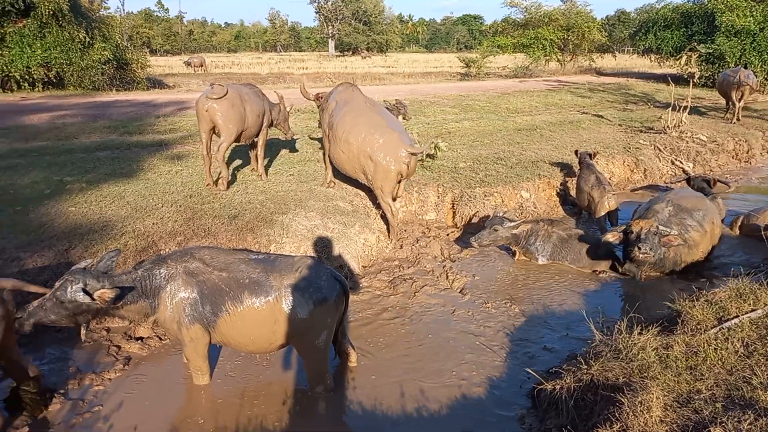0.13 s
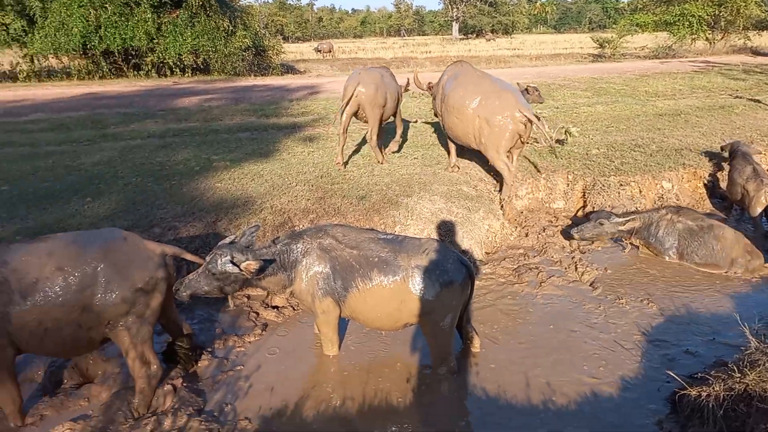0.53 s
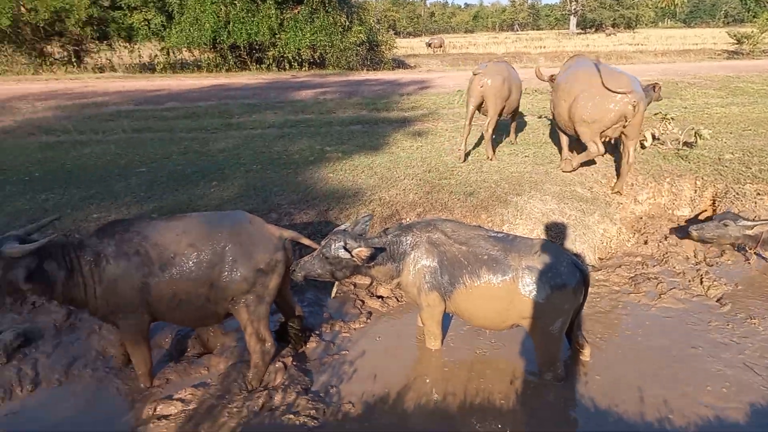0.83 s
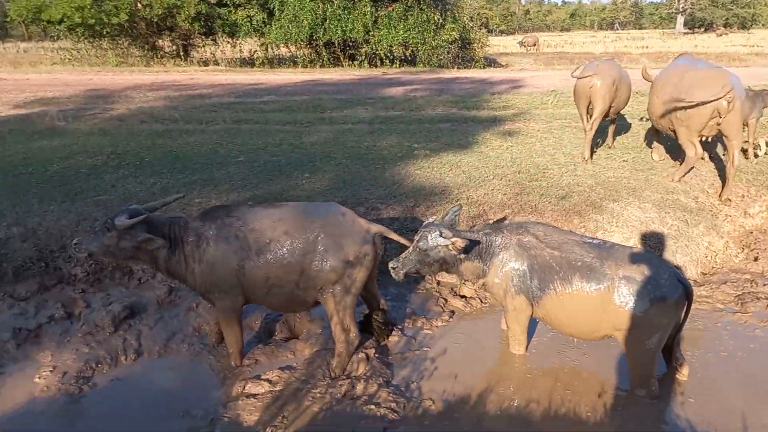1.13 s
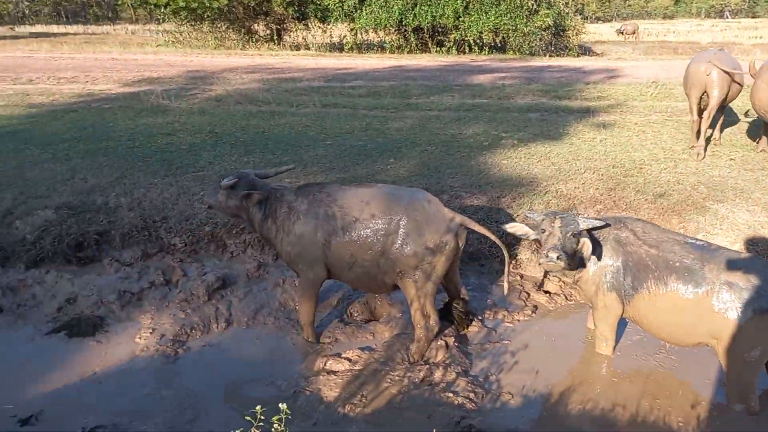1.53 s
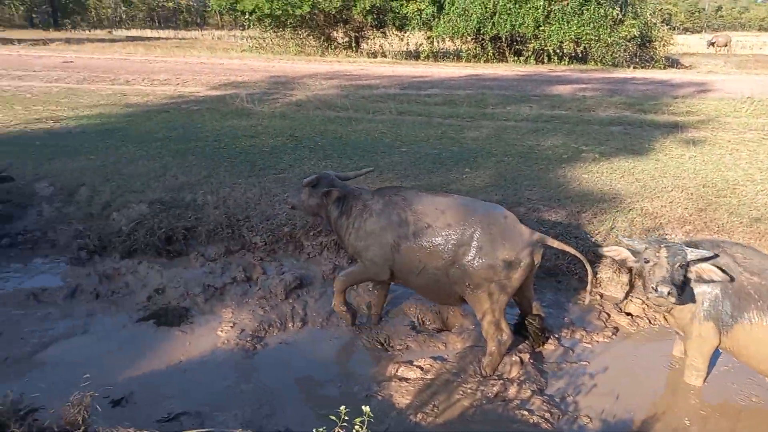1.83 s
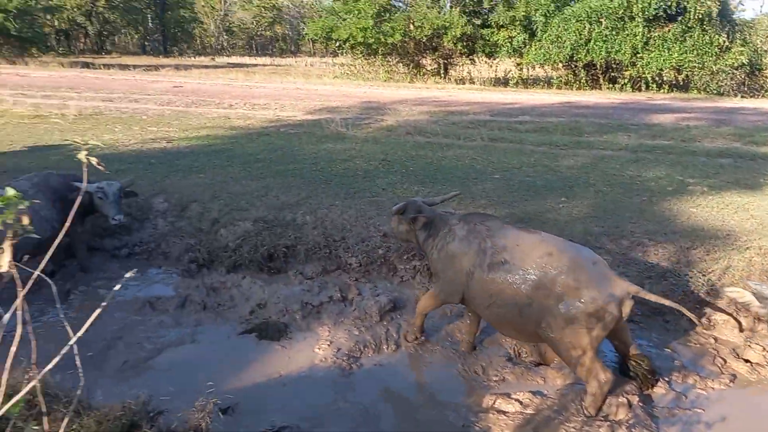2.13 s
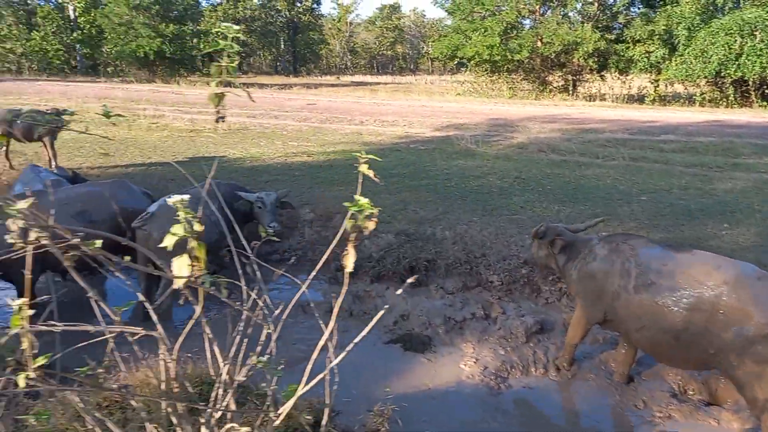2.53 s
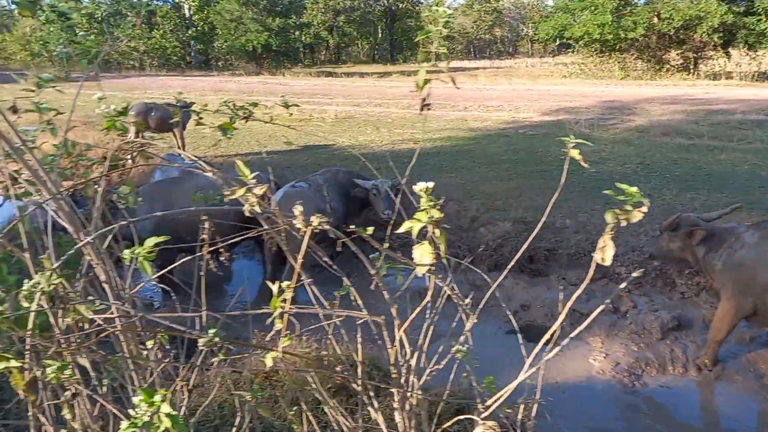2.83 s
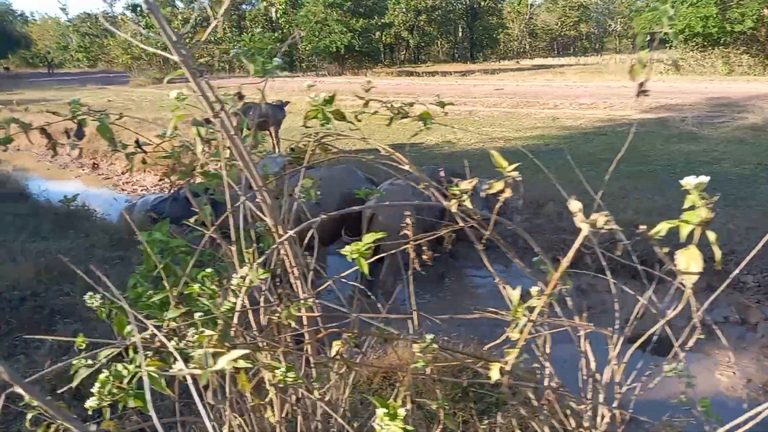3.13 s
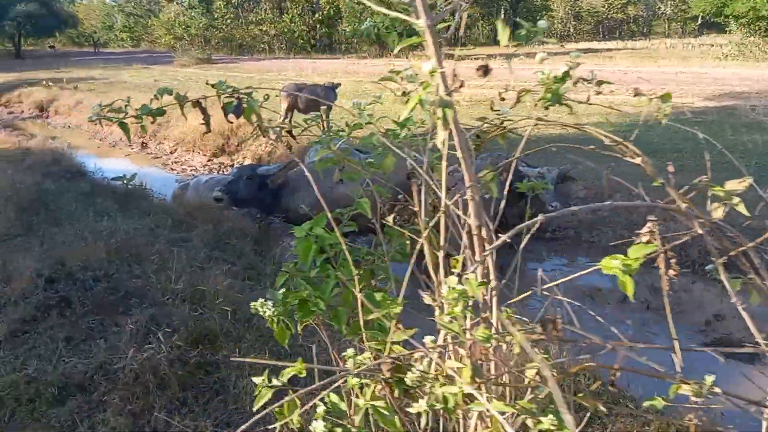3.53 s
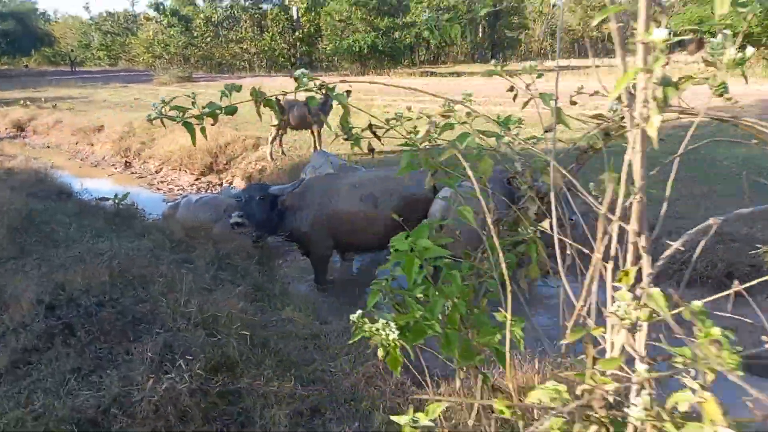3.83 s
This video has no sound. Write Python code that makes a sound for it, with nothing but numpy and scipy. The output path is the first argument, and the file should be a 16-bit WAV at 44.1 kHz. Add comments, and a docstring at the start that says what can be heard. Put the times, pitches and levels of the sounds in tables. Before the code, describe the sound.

Buffaloes wade in a muddy ditch outdoors: gurgling slosh and popping bubbles first, then a run of heavy wet splashes, then quieter stirring with wind buffeting the microphone and stalks crackling close by.

```python
"""Buffaloes wade and wallow in a muddy ditch, with dry stalks crackling near the microphone throughout.
From the start, random grains of plops slosh and gurgle; rising sines pop as bubbles; one splash falls early.
After 1.5 s a run of splashes follows, each a cluster of low plops and clicks. From 2.6 s gusts of lumpy low
noise rumble in the right port, with crunches on drier ground, and after 3.2 s large bubbles pop again.
The right port is muffled in the treble; the left is thin in the bass and hears a little later."""
import sys
import numpy as np
from scipy import signal
from scipy.fft import rfft, irfft, next_fast_len
from scipy.io import wavfile
from scipy.ndimage import uniform_filter1d

SR = 44100
rng = np.random.default_rng(int(sys.argv[2]) if len(sys.argv) > 2 else 0)


def waveform_to_disk(signal):
    """Save audio, clipped to [-1, 1], as 16-bit WAV at the path in sys.argv[1]."""
    frames = np.transpose(np.atleast_2d(signal))
    scaled = np.clip(frames, -1, 1) * 32767
    samples = np.round(scaled).astype(np.int16)
    wavfile.write(sys.argv[1], SR, samples)


N = 176400  # samples, 4 s

# Levels of the ditch and ground sounds are those ahead of the two ports.
# Far low hum: (frequency [Hz], density [dB per Hz, relative])
HUM_COLOUR = [(25, -35), (60, -4), (150, 0.5), (200, -18), (320, -14.5)]
# Low rumble: (frequency [Hz], density [dB per Hz, relative])
RUMBLE_COLOUR = [(28, -47), (52, 0.5), (107, 0), (190, -12), (360, -25.5), (600, -43.5)]
# Gusts on the right port: (time [s], level [dB])
RIGHT_GUSTS = [(2.45, -64), (2.6, -58), (2.69, -24.5), (2.76, -33.5), (2.82, -25.5), (3.04, -26.5),
               (3.1, -32), (3.25, -48), (3.42, -37), (3.64, -29), (3.77, -33), (3.88, -24.5), (4, -26.5)]
# Faint low rumble on the left port: (time [s], level [dB])
FAINT_LEFT_RUMBLE = [(0, -80), (1.55, -81), (1.67, -57), (2.25, -70.5)]
# Single buffets on the right port: (time [s], peak [dB])
WIND_BUFFETS = [(2.861, -21.5), (2.974, -33), (3.077, -29), (3.891, -31.5), (3.925, -18)]

# Crunches in grass and crusted mud: (time [s], level [dB], 60 dB decay [s])
GROUND_CRUNCHES = [(2.821, -53, 0.91), (3.04, -47, 0.26), (3.52, -51.5, 0.24), (3.576, -63, 0.034),
                   (3.704, -39.5, 0.14)]
# Crunch clicks: (frequency [Hz], density [dB per Hz, relative])
CRUST_COLOUR = [(1100, -4), (1600, 4.5), (2800, -3), (3600, -6)]
# Snapping stalks near the microphone: (time [s], level [dB], 60 dB decay [s])
STALK_SNAPS = [(0.12, -46, 0.11), (0.264, -36.5, 0.056), (0.495, -38, 0.032), (.893, -53.5, 0.22),
               (1.624, -48.5, 0.21), (2.124, -42.5, 0.026), (2.134, -36.5, 0.05), (2.232, -51, 0.072),
               (2.331, -51.5, 0.064), (2.71, -54.5, 0.2), (2.975, -49, 0.37), (3.002, -45, 0.035),
               (3.007, -51, 0.029), (3.014, -44, 0.3), (3.029, -35, 0.015), (3.508, -52.5, 0.23),
               (3.611, -46.5, 0.4), (3.707, -44, 0.21)]
# Stalk clicks: (frequency [Hz], density [dB per Hz, relative])
STALK_COLOUR = [(2000, -3), (3000, -2.5), (5100, -5.5), (6800, 0.5), (16000, -1)]

# Deep slosh of wading bodies: (time [s], level [dB])
WADING_LEVEL = [(0, -45), (.35, -43), (.55, -60), (.75, -59), (1.0, -53), (1.18, -56.5), (1.4, -70.5),
                (1.78, -75.5), (2.0, -53.5), (2.35, -75.5), (2.55, -58), (3.18, -66.5), (3.24, -44.5),
                (3.43, -46.5), (3.52, -66.5), (3.63, -53), (3.75, -68), (4, -82)]
# Finer water: (time [s], gurgle level [dB], drip and spray level [dB])
WATER_LEVELS = [(0, -51.5, -55), (.25, -49.5, -56), (.48, -48, -51.5), (.75, -56, -62),
                (1.12, -50.5, -52.5), (1.5, -56.5, -59.5), (1.78, -56, -60.5), (2.1, -51, -56.5),
                (2.3, -69, -64), (2.47, -78, -68.5), (2.55, -64.5, -65.5), (2.85, -59.5, -55.5),
                (3.15, -60.5, -59), (3.35, -56.5, -55), (3.5, -58, -62.5), (3.95, -63.5, -57.5)]
# Slosh, gurgle and spray, each: (frequency [Hz], density [dB per Hz, relative])
SLOSH_COLOUR = [(200, -5.5), (330, -6.5), (550, -4), (750, -10.5), (1200, -20.5)]
GURGLE_COLOUR = [(550, -9.5), (900, 1), (1400, -4), (2500, -8.5), (4000, -21)]
SPRAY_COLOUR = [(2500, 3), (3500, -8.5), (4800, -3.5), (16000, -5)]
# Large bubbles and drips: (time [s], level [dB], starting pitch [Hz], decay [cycles])
BUBBLE_POPS = [(0.265, -29.5, 213, 8.5), (.415, -32, 612, 7.8), (0.441, -32, 900, 8.8),
               (0.469, -29.5, 933, 7.6), (0.644, -35, 3330, 6.3), (.805, -41.5, 913, 12),
               (.826, -36, 910, 8.6), (.944, -35, 740, 6.2), (1.011, -39, 930, 9.9),
               (1.602, -23.5, 602, 5.5), (1.613, -21, 620, 4.7), (1.863, -32, 1750, 7.2),
               (1.881, -20, 199, 1.64), (1.981, -32.5, 612, 9.9), (1.992, -37, 1340, 12),
               (2.035, -35, 830, 11), (2.166, -29.5, 937, 3.8), (3.221, -31, 295.5, 8.8),
               (3.289, -18, 620, 2.5), (3.31, -22, 401, 4)]
# Splashes: (time [s], deep level [dB], bright level [dB], 60 dB decay [s])
SPLASH_HITS = [(0.268, -41, -51.5, 0.42), (1.587, -37, -44.5, 0.18), (1.601, -50, -30.5, 0.054),
               (1.612, -35, -36.5, 0.22), (1.825, -38.5, -40, 0.11), (1.852, -58, -41, 0.046),
               (1.861, -47, -41, 0.1), (1.88, -48, -43, 0.075), (1.92, -49.5, -43.5, 0.096),
               (1.935, -52, -44.5, 0.05), (2.001, -64, -38, 0.037), (2.057, -51, -41.5, 0.049),
               (2.489, -58, -61.5, 0.63), (3.293, -48, -44, 0.22), (3.409, -55, -81, 0.071)]
# Thud grains and smack clicks of a splash, each: (frequency [Hz], density [dB per Hz, relative])
THUD_COLOUR = [(100, -5), (230, 4), (315, -16.5), (650, -0.5), (1100, -32)]
SMACK_COLOUR = [(700, -19), (1120, -1), (2200, -6.5), (3200, -12.5), (3900, -42), (5100, -17.5),
                (6500, -30)]

# Left port over right port: (frequency [Hz], ratio [dB])
PORT_RATIO = [(100, -61), (270, -12.5), (450, -4), (800, -1.5), (1300, -0.5), (2000, 2.5), (3100, 2.5),
              (4500, 28), (6000, 29), (7500, 44), (9500, 7.5), (12000, 18), (15500, -7.5)]
# Share that both ports hear alike: (frequency [Hz], share [0 to 1])
PORT_SHARE = [(300, 1), (700, 1), (1500, 0.69), (4000, 0.19)]
# Treble colour of the microphone: (frequency [Hz], gain [dB])
MIC_TREBLE = [(7300, 1), (8300, -7.5), (9500, -19.5), (12500, -10), (15800, -13)]

HUM_DB, LUMP_DB = -50.5, 4.5  # right-port hum level; depth of the lumps in the rumble
BUFFET_HZ, BUFFET_CYCLES = 176, 0.9  # starting pitch; decay in cycles
SPLASH_RISE_S, SNAP_RISE_S = 0.0017, 0.0014  # time constants of the rise
SOFT_START = 0.98  # cycles, time constant of a plop's onset
GLIDE = 0.082  # fraction by which a plop's pitch rises over its decay cycles
LAG_S = 0.00022  # left port behind right
EDGE_HZ = 15850  # upper band limit


def amp(db):
    """Gain of a level in dB."""
    return 10 ** (np.asarray(db) / 20)


def evened(x):
    """Scaled to rms 1."""
    return x / np.sqrt(np.mean(x ** 2) + 1e-20)


def read(points, hz):
    """A table read on a log-frequency axis."""
    f, value = np.transpose(points)
    return np.interp(np.log(hz + 1), np.log(f + 1), value)


def curve(table, index):
    """Gain over time from one dB column."""
    rows = np.array(table)
    return amp(np.interp(np.arange(N) / SR, rows[:, 0], rows[:, index]))


def bursts(rows, rise_s):
    """Sum of exponential rise-and-decay envelopes from rows (time, dB, t60)."""
    lead = 500  # samples of rise ahead of each peak
    t = np.arange(-lead, SR // 2) / SR
    rise = np.exp(np.minimum(t, 0) / rise_s)
    out = np.zeros(N + SR)
    for s, db, t60 in rows:
        decay = amp(db - 60 * np.maximum(t, 0) / t60)
        out[round(s * SR) - lead:][:len(t)] += decay * rise
    return out[:N]


def plop(hz, cycles):
    """A bubble: a sine that starts softly, rises in pitch and dies after some cycles."""
    turns = np.arange(0, 3 * cycles / hz + 0.0017, 1 / SR) * hz
    tone = np.sin(2 * np.pi * turns * (1 + GLIDE * turns / cycles / 2))
    return tone * (1 - np.exp(-turns / SOFT_START)) * np.exp(-2 * turns / cycles)


def hits(per_s, spread_db):
    """Sparse single hits of uneven size at random times; two draws."""
    size = amp(spread_db * np.minimum(rng.exponential(1, (2, N)), 4))
    return size * (rng.random((2, N)) < per_s / SR)


def washed(sparse, wash):
    """Hits mixed with noise that takes the given share of the power."""
    return np.sqrt(1 - wash) * evened(sparse) + np.sqrt(wash) * rng.standard_normal((2, N))


def grains(colour, level, per_s, cycles, spread_db, wash, patchy_db, count=22):
    """Random plops of many pitches over a wash of far ones, in drifting patches; two draws."""
    pitches = np.geomspace(colour[0][0], colour[-1][0], count)
    sparse = hits(per_s, spread_db)
    kind = rng.integers(0, count, (2, N))
    # each pitch swells and fades on its own, much like its neighbours
    patch = uniform_filter1d(rng.standard_normal((N // 256 + 1, count)), size=10, axis=0)
    patch = evened(uniform_filter1d(patch, size=3, axis=1))
    patch = evened(amp(patchy_db * patch))[np.arange(N) // 256, kind]
    drive = level * patch * washed(sparse, wash)
    span, spectrum = next_fast_len(N + SR // 4), 0
    for k, hz in enumerate(pitches):
        shape = plop(hz, cycles)
        shape = shape / np.linalg.norm(shape)
        gain = np.sqrt(hz) * amp(read(colour, hz))  # log-spaced pitches, density per Hz
        spectrum = spectrum + rfft(drive * (kind == k), span) * rfft(shape, span) * gain
    power = np.mean(pitches * amp(2 * read(colour, pitches)))
    return irfft(spectrum, span)[:, :N] / np.sqrt(power)


def clumps(colour, rows, rise_s, per_s, spread_db, wash, first_db):
    """Each row is one sharp contact and a dying clump of uneven clicks of one colour; two draws."""
    hz = np.fft.rfftfreq(512, 1 / SR)
    band = (hz > colour[0][0] / 2) * (hz < colour[-1][0])
    click = np.fft.fftshift(irfft(amp(read(colour, hz)) * band))
    click = click * np.hanning(len(click))
    sparse = hits(per_s, spread_db)
    sparse *= rng.choice([-1, 1], (2, N))
    drive = bursts(rows, rise_s) * washed(sparse, wash)
    for s, db, _ in rows:
        drive[:, round(s * SR)] += amp(db + first_db)  # the first contact
    return signal.oaconvolve(drive, click[None] / np.linalg.norm(click), "same")


def low_noise(colour):
    """Two draws of coloured noise, cut by 60 dB above the last table row."""
    hz = np.fft.rfftfreq(N, 1 / SR)
    gain = amp(read(colour, hz) - 60 * (hz > colour[-1][0]))
    return evened(irfft(rfft(rng.standard_normal((2, N))) * gain, N))


def far_hum():
    """Low noise from afar, much weaker in the left port."""
    return low_noise(HUM_COLOUR) * amp([[HUM_DB - 25.0], [HUM_DB]])


def gusts_and_left_rumble():
    """Lumpy low noise: gusts and single buffets on the right port, a faint separate rumble on the left."""
    lumps = evened(uniform_filter1d(uniform_filter1d(rng.standard_normal(N), 900), 900))
    levels = np.array([curve(FAINT_LEFT_RUMBLE, index=1), curve(RIGHT_GUSTS, index=1)])
    out = evened(low_noise(RUMBLE_COLOUR) * amp(LUMP_DB * lumps)) * levels
    push = plop(BUFFET_HZ, BUFFET_CYCLES)
    push = push / abs(push).max()
    for s, db in WIND_BUFFETS:
        out[1, round(s * SR):][:len(push)] += amp(db) * push
    return out


def crunches():
    """Steps on drier ground: short mid-pitched crackle."""
    return clumps(CRUST_COLOUR, GROUND_CRUNCHES, SPLASH_RISE_S, per_s=500, spread_db=5.0,
                  wash=0.24, first_db=10)


def stalks():
    """Dry stalks snap close by: one sharp tick, then a dying crackle."""
    return clumps(STALK_COLOUR, STALK_SNAPS, SNAP_RISE_S, per_s=830, spread_db=2.4,
                  wash=0.42, first_db=16.5)


def bubbles():
    """Single large bubbles and drips, each one ringing plop."""
    out = np.zeros(N + SR)
    for s, db, hz, cycles in BUBBLE_POPS:
        sound = amp(db) * plop(hz, cycles)
        out[round(s * SR):][:len(sound)] += sound
    return np.array([out[:N], out[:N]])


def splashes():
    """Legs and bodies strike the mud: deep grains, and a wet smack with its crackle."""
    deep = [(s, db, t60) for s, db, _, t60 in SPLASH_HITS]
    bright = [(s, db, t60) for s, _, db, t60 in SPLASH_HITS]
    thud = grains(THUD_COLOUR, bursts(deep, SPLASH_RISE_S), per_s=900, cycles=2.5,
                  spread_db=3.0, wash=0.49, patchy_db=-3, count=12)
    smack = clumps(SMACK_COLOUR, bright, SPLASH_RISE_S, per_s=500, spread_db=5.1,
                   wash=0.45, first_db=15.5)
    return thud + smack


def mud():
    """The steady stirring: plops massed into deep slosh, gurgle and fine spray."""
    slosh = grains(SLOSH_COLOUR, curve(WADING_LEVEL, index=1), per_s=1500, cycles=5.4,
                   spread_db=1.3, wash=0.58, patchy_db=2.5, count=18)
    gurgle = grains(GURGLE_COLOUR, curve(WATER_LEVELS, index=1), per_s=600, cycles=9.4,
                    spread_db=3.9, wash=0.56, patchy_db=4.0)
    spray = grains(SPRAY_COLOUR, curve(WATER_LEVELS, index=2), per_s=1700, cycles=3.1,
                   spread_db=0.79, wash=0.57, patchy_db=3.0)
    return slosh + gurgle + spray


def ports(x):
    """Two ports share part of the sound; each colours it in its own way, the left one later."""
    hz = np.fft.rfftfreq(N, 1 / SR)
    first, second = rfft(x) * amp(read(MIC_TREBLE, hz))
    same, ratio = np.clip(read(PORT_SHARE, hz), 0, 1), amp(read(PORT_RATIO, hz))
    lag = np.exp(-1j * 2 * np.pi * hz * LAG_S)
    left = 2 * ratio / (1 + ratio) * first * lag
    right = 2 / (1 + ratio) * (same * first + np.sqrt(1 - same ** 2) * second)
    return irfft(np.array([left, right]), N)


def scene():
    """Water, steps and stalks through the two ports; wind, a faint left rumble and far hum added straight to
    them."""
    ditch = mud() + splashes() + bubbles()
    ground = stalks() + crunches()
    return ports(ditch + ground) + gusts_and_left_rumble() + far_hum()


def record(dry):
    """The band limit: a steep low-pass filter."""
    lowpass = signal.firwin(511, EDGE_HZ, window=("kaiser", 9), fs=SR)
    return signal.oaconvolve(dry, lowpass[None], "same")


dry = scene()
out = record(dry)
waveform_to_disk(out)
```